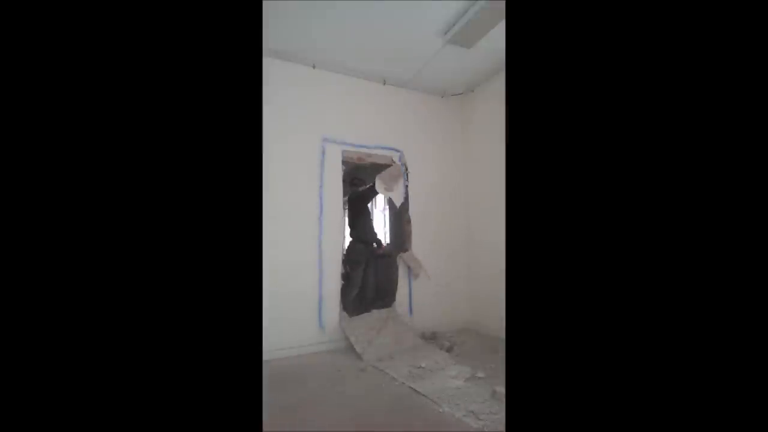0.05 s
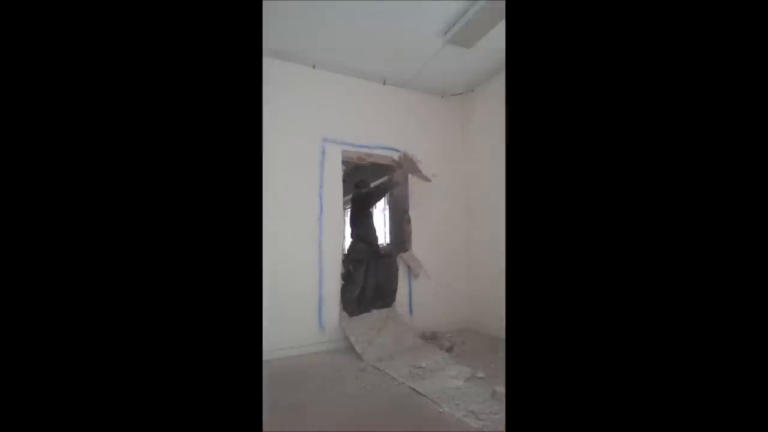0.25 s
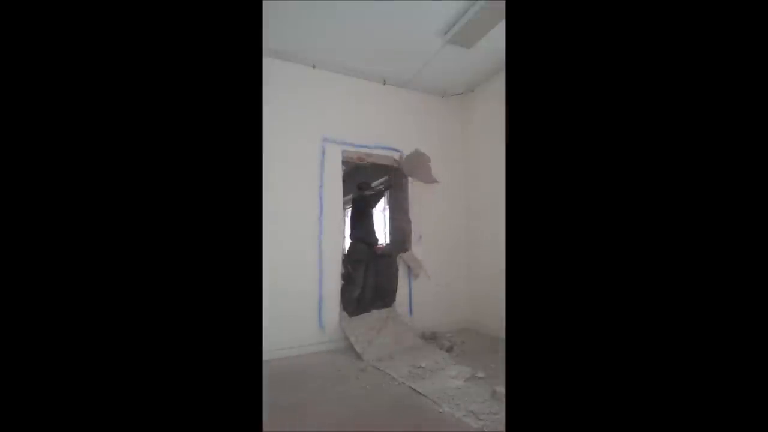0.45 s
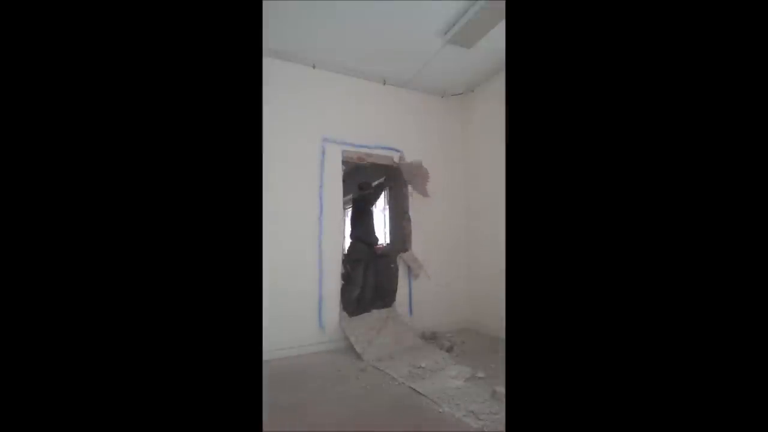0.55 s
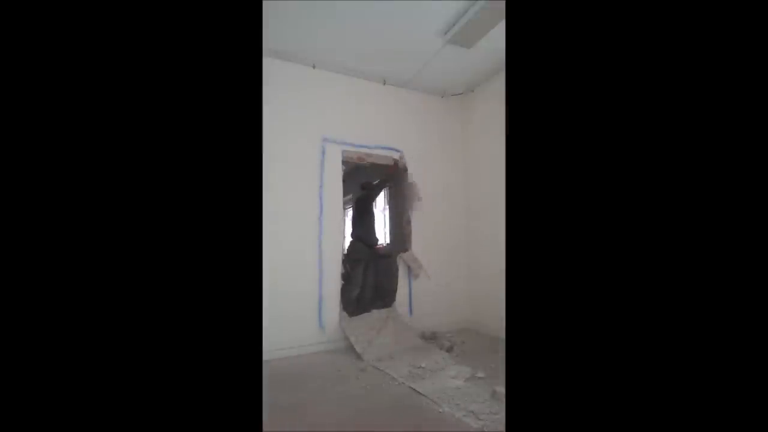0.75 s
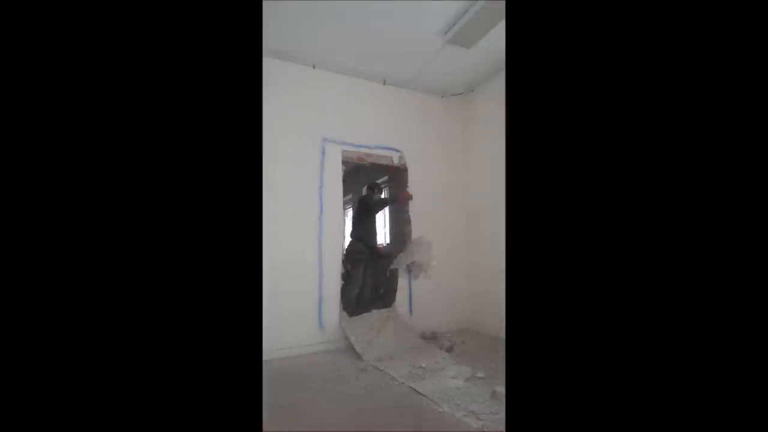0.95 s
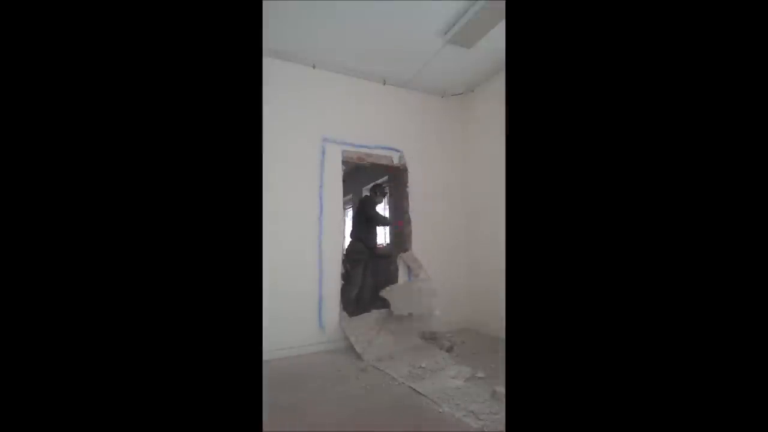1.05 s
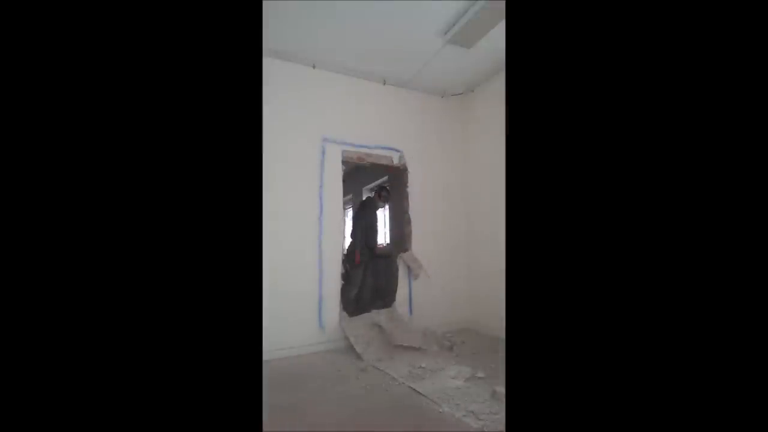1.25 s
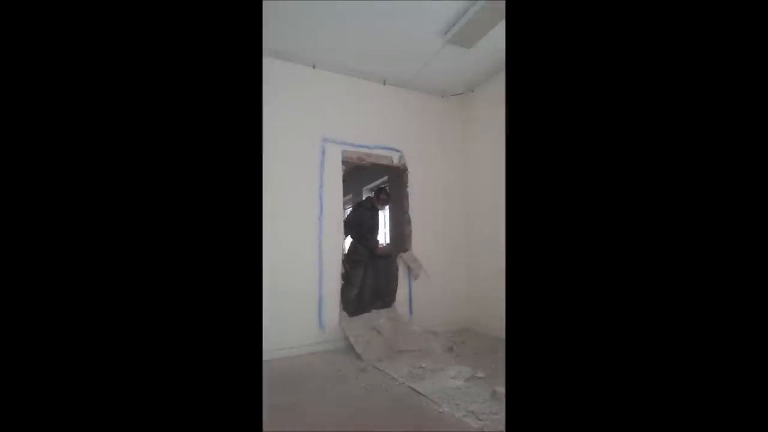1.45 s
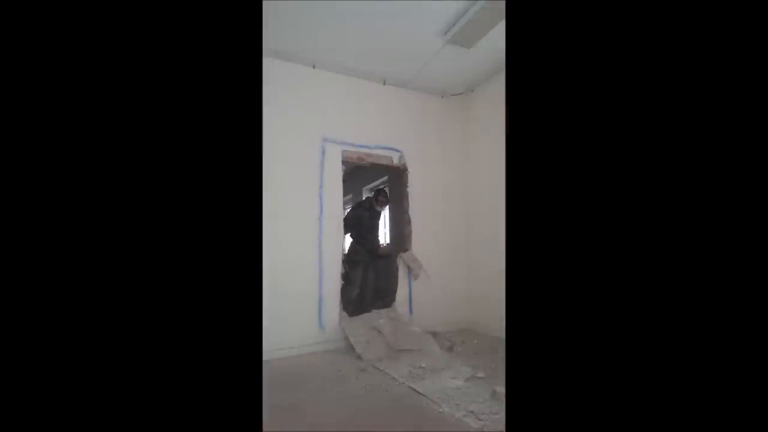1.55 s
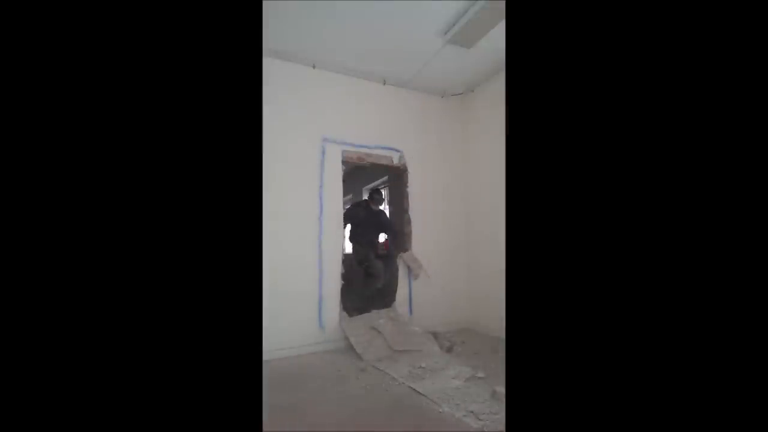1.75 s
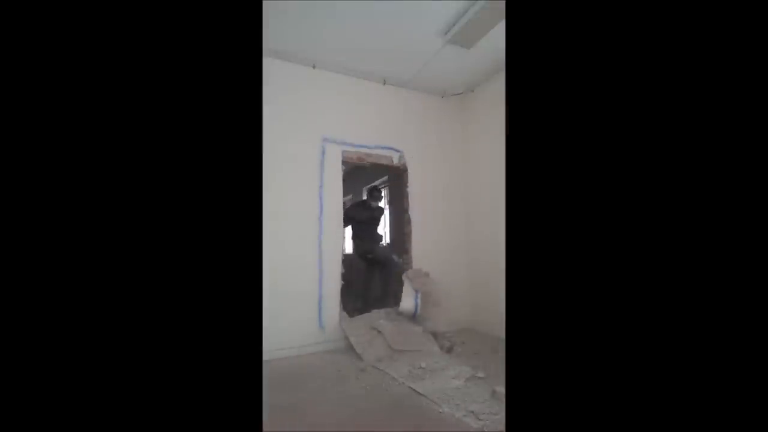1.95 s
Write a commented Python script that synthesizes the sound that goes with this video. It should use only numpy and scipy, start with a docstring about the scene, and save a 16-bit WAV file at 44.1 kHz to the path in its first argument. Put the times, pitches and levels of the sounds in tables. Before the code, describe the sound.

One hard knock cracks wallboard loose, and it shudders before falling onto rubble in two crashes, the second with a deep thud. Crumbs and grit patter afterwards. The empty room echoes, with the sound leaning to the microphone's left.

```python
"""A brief patter of crumbs, then one hard, hollow blow on wallboard over a doorway in a bare, echoing room.
The impact excites the wall's modes and cracks a piece loose; it rattles, falls and breaks up on the
debris, then a second piece comes down with a crash and a heavy thud. Chips clink and grit trickles
over the building's low wash. Contacts are impulses, fractures are bursts of clicks, resonances are
damped sines, and the echo is a diffuse field that decays band by band."""
import sys
import numpy as np
from scipy import signal
from scipy.fft import rfft, irfft, next_fast_len
from scipy.io import wavfile

SR = 44100
rng = np.random.default_rng(int(sys.argv[2]) if len(sys.argv) > 2 else 0)


def bounce(signal):
    """Save signal as a 16-bit WAV file at the path given by the first command-line argument."""
    frames = np.transpose(np.atleast_2d(signal))
    limited = np.clip(frames, -1, 1)
    pcm = np.round(limited * 32767).astype(np.int16)
    wavfile.write(sys.argv[1], SR, pcm)


N = 88200
TIME = np.arange(N) / SR
FFT_SIZE = next_fast_len(N + SR // 4, True)
LOG_HZ = np.log(np.maximum(np.arange(FFT_SIZE // 2 + 1) * SR / FFT_SIZE, 1))
BLOW_S, BUILD_UP_S, FRACTURES_PER_S = .2283, .0025, 1300

# Spectra of the knock and of the snapping gypsum: frequency_hz, gain_db
KNOCK_SPECTRUM = [(30, -31), (60, -10), (130, -8), (240, -1.5), (340, -3), (540, -4), (690, 3.5), (850, -5),
                  (1200, -8), (1480, -20.5), (3000, -35.5), (16000, -100)]
SNAP_SPECTRUM = [(200, -12), (1300, -1.5), (2000, 2), (2900, 2), (4000, -3), (5500, -15.5), (8000, -29),
                 (11000, -29.5), (16000, -32)]
# Normal modes of the wall: pitch_hz, level_db, t60_s, swell_s
WALL_RESONANCES = [(57.6, -24.5, 2.6, .0025), (85.3, -35, 5, 0.014), (128.2, -22.5, 0.85, 0.001),
                   (221.8, -22.5, 0.84, 0.0041), (275.1, -24.5, 1.08, .0021), (391, -27.5, 1.1, 0.017),
                   (670, -23, 0.89, 0.043), (706, -21.5, 1.12, 0.03), (1103, -36, .75, 0.017)]
def blow():
    """Impact excitation: one impulse knocks the wall, snaps the gypsum and sets the modes ringing."""
    knock = colour(room(tap(BLOW_S, db=-14), direct_db=23.5), KNOCK_SPECTRUM)
    snap = colour(room(fracture(BLOW_S + .0036, db=-21, crumble_s=.002)), SNAP_SPECTRUM)
    return knock + snap + sum(ring(BLOW_S, *mode) for mode in WALL_RESONANCES)


# Strength of the board's shudder: time_s, level_db
SHUDDER_ENVELOPE = [(.23, -32), (.30, -14), (.335, -8.5), (.39, -37)]
# Its hollow resonance: frequency_hz, gain_db
HOLLOW_SPECTRUM = [(100, -53), (560, -26), (640, -10), (695, -8.5), (745, -3.5), (830, -24.5),
                   (1400, -43.5), (16000, -87)]
def shuddering_board():
    """Forced vibration: a short run of dense clicks drives the loosened board's resonance."""
    level_db = np.interp(TIME, *np.transpose(SHUDDER_ENVELOPE), left=-np.inf, right=-np.inf)
    return colour(room(grains(FRACTURES_PER_S) * from_db(level_db)), HOLLOW_SPECTRUM)


# Knocks against the frame: start_s, level_db
FRAME_KNOCKS = [(.3183, -11), (.3393, -12), (.3618, -15), (.3948, -17), (.4487, -22), (.5192, -25),
                (.6556, -34)]
# Modes of the loose board: pitch_hz, gain_db, t60_s
BOARD_RESONANCES = [(673, 4, 0.07), (745, -1, .07)]
def rattling_board():
    """Damped free vibration: each knock on the frame, weaker than the last, rings a short hollow note."""
    return sum(ring(start_s, hz, level_db + gain_db, t60_s)
               for start_s, level_db in FRAME_KNOCKS for hz, gain_db, t60_s in BOARD_RESONANCES)


# Pieces hitting the debris: start_s, thud_db, slap_db, crack_db, crumble_s
IMPACTS = [(.741, -51, -27, -36, 0.0078), (.751, -35.5, -28.5, -27.5, 0.025),
           (.796, -31, -22, -24.5, 0.011), (.844, -38, -31, -31, .004), (.898, -33, -22, -24, .025),
           (1.137, -34.5, -31, -30.5, .0034), (1.219, -34, -50, -28.5, .008),
           (1.315, -32.5, -29.5, -29, 0.0079), (1.325, -28, -23, -19, 0.0039),
           (1.339, -26.5, -24, -31, 0.0024), (1.357, -24, -41, -32, .0033), (1.376, -26.5, -24, -48, 0.029),
           (1.72, -37, -38.5, -40, 0.017), (1.825, -44, -33.5, -40.5, .013)]
# Spectra of the three parts of an impact: frequency_hz, gain_db
THUD_SPECTRUM = [(25, -43), (45, -39), (65, -2.5), (100, -11.5), (140, 0), (200, 3.5), (310, -4.5),
                 (450, -8.5), (1000, -25), (16000, -81)]
SLAP_SPECTRUM = [(40, -14.5), (200, -16), (390, 0), (520, -1), (750, -5), (1100, -6.5), (1600, -11),
                 (3500, -26), (16000, -88)]
CRACK_SPECTRUM = [(200, -16), (900, -7.5), (1400, -3.5), (2100, -1), (2900, -1.5), (4200, -6.5),
                  (5500, -13.5), (8000, -26.5), (11000, -31), (16000, -30.5)]
# Modes of the stiff shards, relative to the crack: pitch_hz, gain_db
SHARD_RESONANCES = [(1936, -8.5), (2530, -11), (2772, -9.5), (2937, -21), (3770, -16)]
def falling_pieces():
    """Inelastic collision: a piece's mass thuds, its face slaps, its edges crack and its shards ring."""
    thuds = slaps = cracks = clatter = 0
    for start_s, thud_db, slap_db, crack_db, crumble_s in IMPACTS:
        thuds += tap(start_s, thud_db)
        slaps += fracture(start_s, slap_db, crumble_s)
        cracks += fracture(start_s, crack_db, crumble_s)
        for hz, gain_db in SHARD_RESONANCES:
            stereo_gains = rng.normal(0, 1, (2, 1))
            clatter += stereo_gains * ring(start_s, hz, crack_db + gain_db, t60_s=.73)
    parts = [(thuds, THUD_SPECTRUM), (slaps, SLAP_SPECTRUM), (cracks, CRACK_SPECTRUM)]
    return clatter + sum(colour(room(force), spectrum) for force, spectrum in parts)


# Room modes excited by heavy contacts: start_s, pitch_hz, level_db, t60_s
ROOM_MODES = [(.38, 266, -19.5, 0.34), (0.81, 58, -23, 2.8), (0.782, 119, -25, 1.4),
              (1.137, 114, -27.5, 0.82), (1.367, 173, -13, 0.27), (1.367, 178, -25, 1.9),
              (1.366, 279, -21.5, 0.45), (1.53, 190, -23.5, 0.53)]
def booming_room():
    """Standing waves: heavy contacts set the room's low modes booming."""
    return sum(ring(*mode, swell_s=.0047) for mode in ROOM_MODES)


# Brittle chips landing: start_s, level_db, pitch_hz
CHIP_HITS = [(.52, -52, 2780), (.781, -24.5, 3226), (0.926, -32, 4400), (1.126, -36, 5150),
             (1.142, -29, 3590), (1.221, -31, 3850), (1.245, -34.5, 4250), (1.357, -31, 2740),
             (1.451, -36, 3870)]
# Spectrum of their clicks: frequency_hz, gain_db
CHIP_SPECTRUM = [(300, -6.5), (2000, -6.5), (3000, 9), (4000, 3.5), (5000, -6.5), (8000, -30.5),
                 (16000, -40)]
def chips():
    """Free vibration of small, stiff bodies: each chip clicks and rings briefly at its own high pitch."""
    clicks = sum(fracture(start_s, db, crumble_s=.003) for start_s, db, _ in CHIP_HITS)
    clinks = sum(ring(start_s, hz, db + 6, t60_s=.035, swell_s=.00039) for start_s, db, hz in CHIP_HITS)
    return clinks + colour(room(clicks, direct_db=30), CHIP_SPECTRUM)


# Flow of crumbs and of grit: time_s, level_db
CRUMB_ENVELOPE = [(0, -20.5), (.15, -96), (.62, -65), (.72, -26), (.79, -18), (1.05, -16.5), (1.2, -19.5),
                  (1.3, -26), (1.42, -23.5), (1.6, -25), (1.8, -29.5), (2, -33.5)]
GRIT_ENVELOPE = [(0, -55), (.2, -47), (.43, -40), (.55, -78), (.72, -46), (.8, -30), (.92, -22.5),
                 (1.05, -30), (1.13, -21.5), (1.3, -41), (1.75, -38), (1.92, -43), (2, -32)]
# Their spectra: frequency_hz, gain_db
CRUMB_SPECTRUM = [(100, -35), (400, 0.5), (750, 10.5), (1500, -1), (3000, 4.5), (4500, -1), (7000, -30),
                  (10000, -27), (16000, -31)]
GRIT_SPECTRUM = [(500, -28), (3000, -11), (5000, 3.5), (6500, -1.5), (8500, -12), (11000, -16.5),
                 (16000, -17)]
def crumbs_and_grit():
    """Shot noise: random tiny impacts add up to a patter of crumbs and a brighter hiss of sliding grit."""
    crumbs = grains(per_s=220) * from_db(np.interp(TIME, *np.transpose(CRUMB_ENVELOPE)))
    grit = grains(per_s=410) * from_db(np.interp(TIME, *np.transpose(GRIT_ENVELOPE)))
    return colour(room(crumbs, direct_db=19), CRUMB_SPECTRUM) + colour(room(grit), GRIT_SPECTRUM)


# Spectrum of the building's wash: frequency_hz, gain_db
AMBIENT_SPECTRUM = [(20, -38), (55, -10), (110, 2), (170, 0.5), (260, -7.5), (450, -9.5), (730, -10),
                    (1100, -16.5), (3000, -20), (6000, -34.5), (16000, -52)]
def background():
    """Stationary noise: the low, steady wash of the building arrives from all sides."""
    return from_db(-41.5) * colour(irfft(diffuse_noise(), FFT_SIZE)[:, :N], AMBIENT_SPECTRUM)


# Reverberation time by band: frequency_hz, t60_s
REVERB_TIMES = [(60, 2.45), (160, 1.35), (400, 1.08), (700, 1.28), (1300, 1.376), (2800, 1.253),
                (6000, 0.8), (14000, 0.62)]
def room(x, direct_db=9.5):
    """Reverberation: after the direct sound, reflections store its energy and lose it band by band."""
    def stored(decay_s):
        return signal.lfilter([1], [1, -np.exp(-2 / (decay_s * SR))], x ** 2 + 1e-18)
    noise, echo = diffuse_noise(), 0
    early_energy = from_db(5.5) ** 2 * stored(decay_s=.0052)
    fill = np.exp(-1 / (BUILD_UP_S * SR))
    for centre_hz, t60_s in REVERB_TIMES:
        band = per_bin([(hz, hz == centre_hz) for hz, _ in REVERB_TIMES])
        energy = signal.lfilter([1 - fill], [1, -fill], early_energy + stored(t60_s / np.log(1000)))
        echo += irfft(noise * band, FFT_SIZE)[:, :N] * np.sqrt(energy)
    right = np.pad(x, (int(.00048 * SR), 0))[:N]  # reaches the right microphone later
    return echo + from_db(direct_db) * np.array([x, right])


# Likeness of left and right: frequency_hz, correlation
COHERENCE = [(60, 0.92), (130, 1), (260, 0.83), (520, 0.82), (800, 0.64), (1200, -0.3), (2000, -0.22),
             (16000, 0.01)]
def diffuse_noise():
    """Diffuse field: the spectrum of white noise, partly coherent between the two microphones."""
    mid, side = rfft(rng.standard_normal((2, FFT_SIZE)))
    alike = np.clip(per_bin(COHERENCE), -1, 1)
    return np.sqrt((1 + alike) / 2) * mid + np.sqrt((1 - alike) / 2) * side * [[1], [-1]]


def tap(start_s, db):
    """Impulse: one clean contact."""
    return from_db(db) * (np.arange(N) == int(start_s * SR))


def grains(per_s):
    """Poisson process: clicks of very uneven size, with unit energy per second."""
    sizes_db = 4.5 * np.minimum(rng.exponential(1, N), 4)
    signs = rng.choice([-1, 1], N)
    clicks = from_db(sizes_db) * signs * (rng.random(N) < per_s / SR)
    return clicks / (clicks.std() * np.sqrt(SR))


def fracture(start_s, db, crumble_s):
    """Brittle fracture: a first break and a dying run of tiny ones, with the energy of one tap in all."""
    run = grains(FRACTURES_PER_S) * (TIME >= start_s) * np.exp(-np.abs(TIME - start_s) / crumble_s)
    run += tap(start_s, db=7) / np.sqrt(FRACTURES_PER_S)  # 7 dB above a typical break
    return from_db(db) * run / np.sqrt(np.sum(run ** 2) + 1e-20)


def ring(start_s, hz, db, t60_s, swell_s=BUILD_UP_S):
    """Damped oscillator: a sine that builds up and decays exponentially."""
    age = np.maximum(TIME - start_s, 0)
    swell = (1 - np.exp(-age / swell_s)) ** 2
    return from_db(db - 60 * age / t60_s) * swell * np.sin(2 * np.pi * hz * age)


def colour(x, spectrum):
    """Minimum-phase filter: a causal response of the given shape, with a power gain of one."""
    gain = from_db(per_bin(spectrum))
    cepstrum = irfft(np.log(gain / np.sqrt(np.mean(gain ** 2))), FFT_SIZE)
    fold = 1 + np.sign(FFT_SIZE / 2 - np.arange(FFT_SIZE))  # onto positive time
    fold[0] = 1
    response = np.exp(rfft(cepstrum * fold))
    return irfft(rfft(x, FFT_SIZE) * response, FFT_SIZE)[..., :N]


def per_bin(points):
    """Interpolation over log frequency, at every FFT bin."""
    hz, value = np.transpose(points)
    return np.interp(LOG_HZ, np.log(hz), value)


def from_db(db):
    """Decibels to amplitude ratio."""
    return 10 ** (np.asarray(db) / 20)


def scene():
    """Superposition: all sources add at the two microphones."""
    wall = blow() + shuddering_board() + rattling_board()
    return wall + falling_pieces() + booming_room() + chips() + crumbs_and_grit() + background()


# Balance of the microphones: frequency_hz, left_minus_right_db
LEVEL_DIFFERENCE = [(60, 3), (125, 3), (250, 4), (1000, 7.5), (2000, 7.5), (4000, 9.5), (8000, 12.5),
                    (12000, 10.5)]
def record(dry):
    """Transduction: the left side is louder, most in the treble; the band is limited and peaks saturate."""
    sides = from_db(per_bin(LEVEL_DIFFERENCE) / 2 * np.array([[1], [-1]]))
    heard = irfft(rfft(dry, FFT_SIZE) * sides, FFT_SIZE)[:, :N]
    low_cut_hz, high_cut_hz, ceiling = 42, 15700, .92
    heard = signal.sosfilt(signal.butter(2, low_cut_hz, "high", fs=SR, output="sos"), heard)
    heard = ceiling * heard / (ceiling ** 6 + heard ** 6) ** (1 / 6)
    return signal.sosfilt(signal.ellip(12, .1, 80, high_cut_hz, fs=SR, output="sos"), heard)


dry = scene()
out = record(dry)
bounce(out)
```